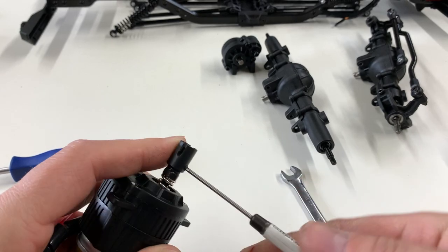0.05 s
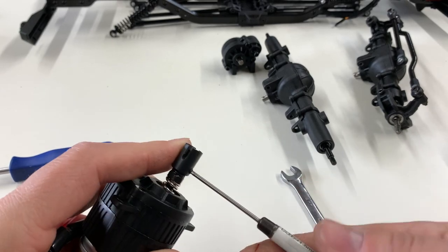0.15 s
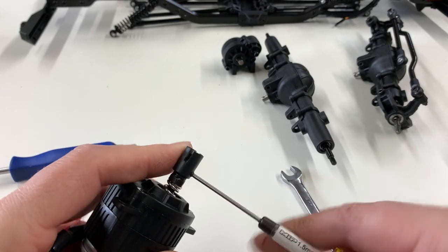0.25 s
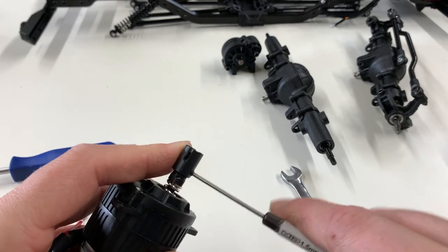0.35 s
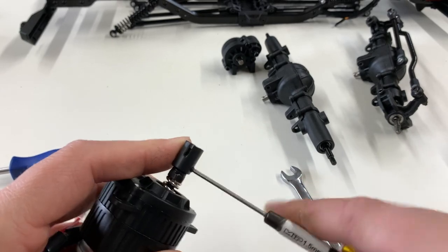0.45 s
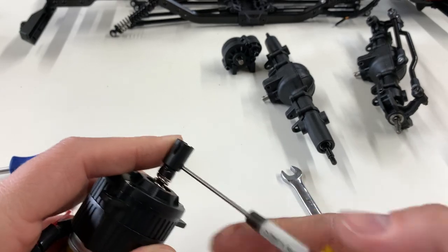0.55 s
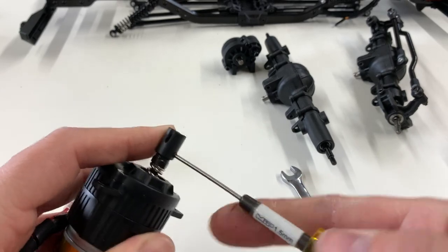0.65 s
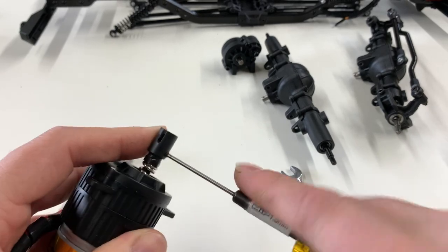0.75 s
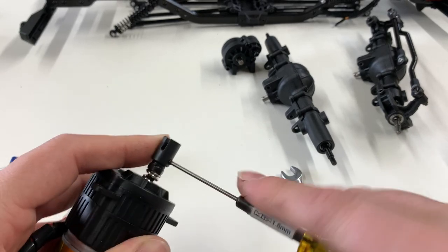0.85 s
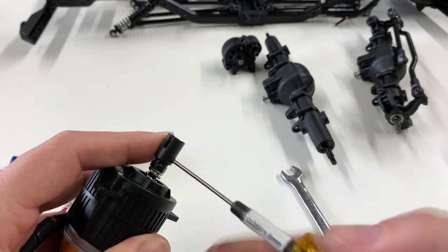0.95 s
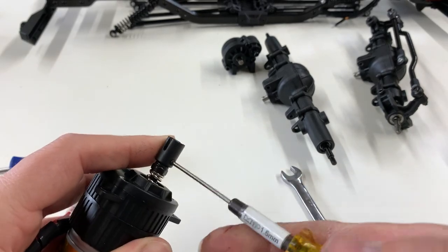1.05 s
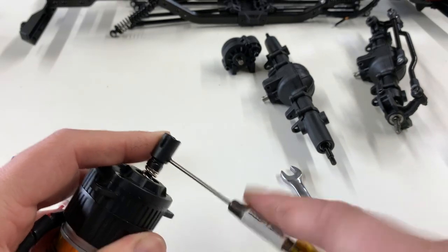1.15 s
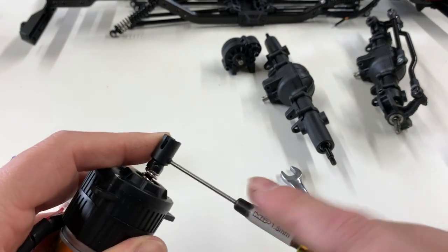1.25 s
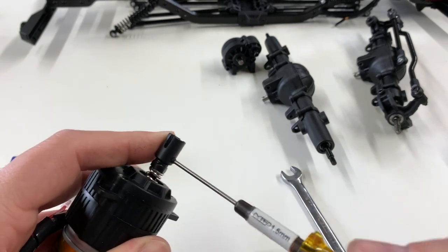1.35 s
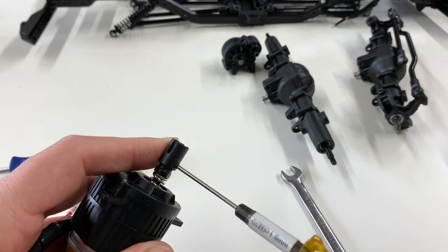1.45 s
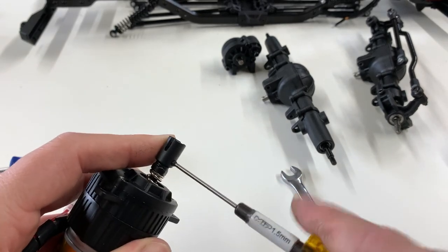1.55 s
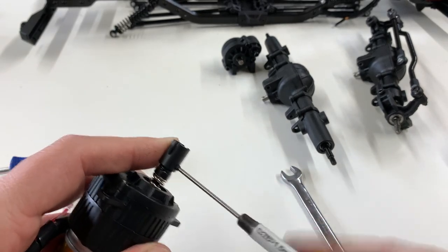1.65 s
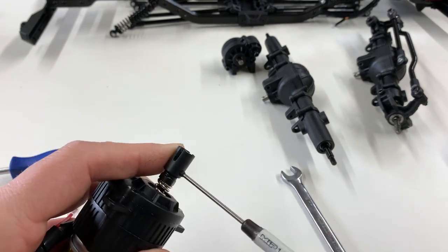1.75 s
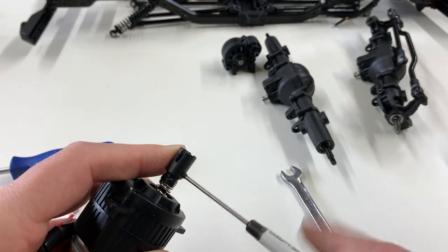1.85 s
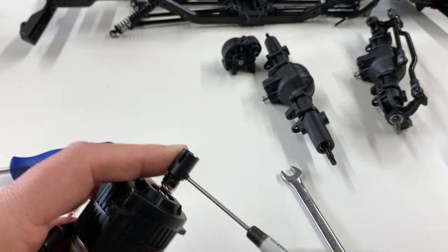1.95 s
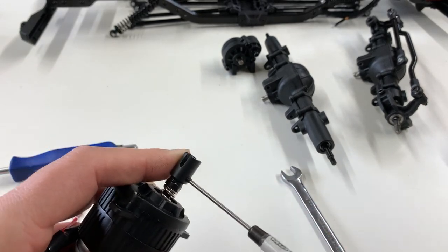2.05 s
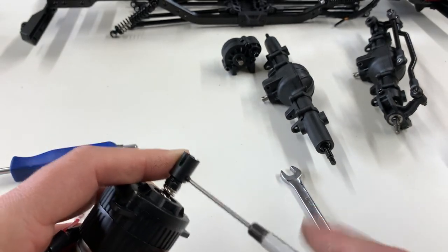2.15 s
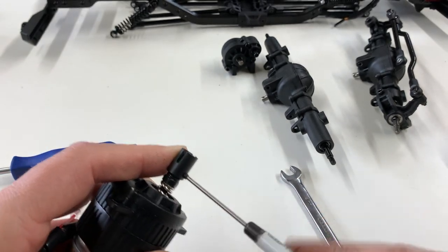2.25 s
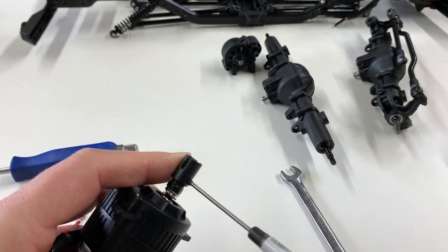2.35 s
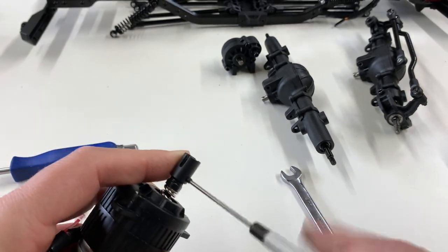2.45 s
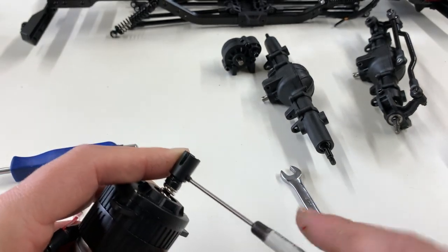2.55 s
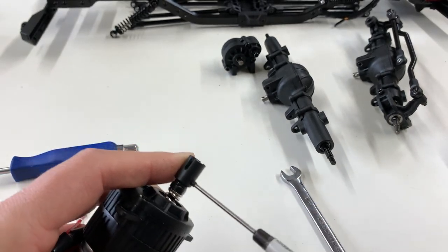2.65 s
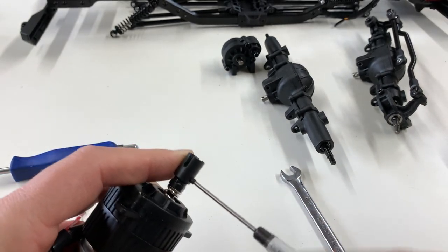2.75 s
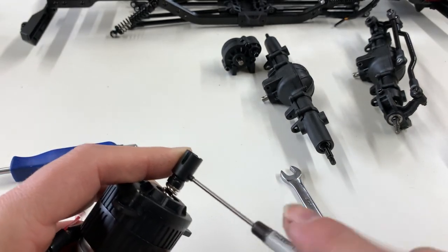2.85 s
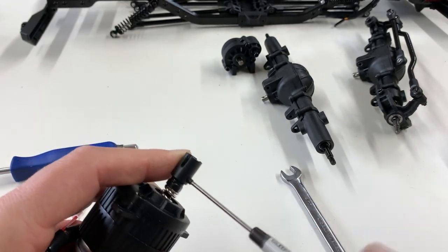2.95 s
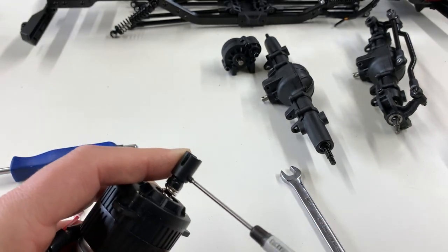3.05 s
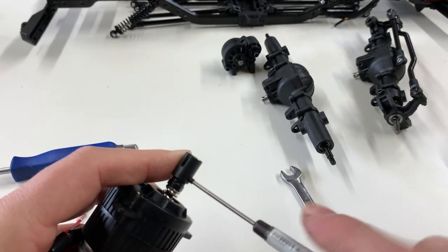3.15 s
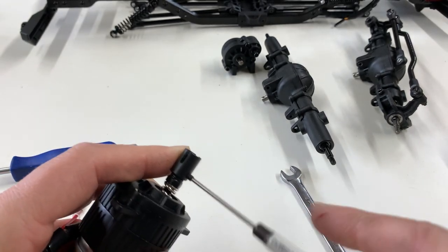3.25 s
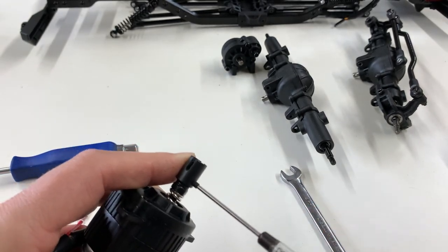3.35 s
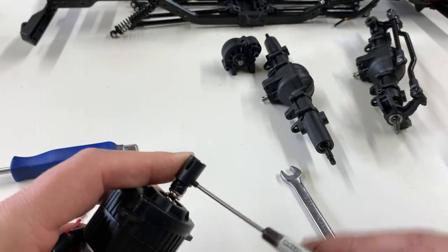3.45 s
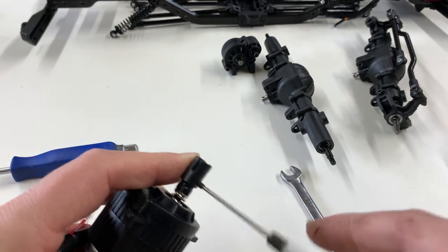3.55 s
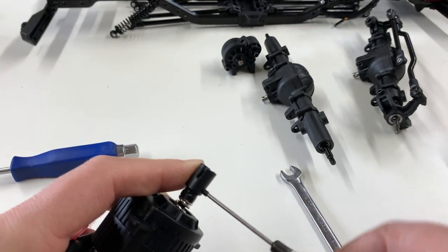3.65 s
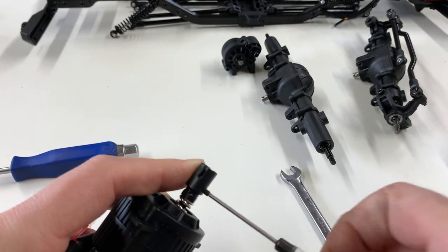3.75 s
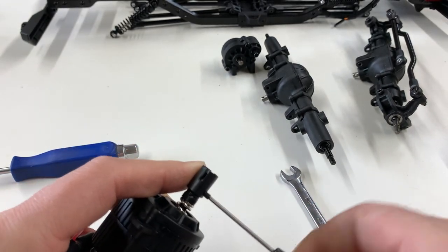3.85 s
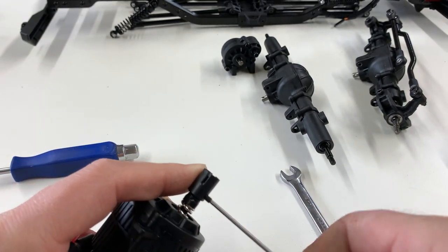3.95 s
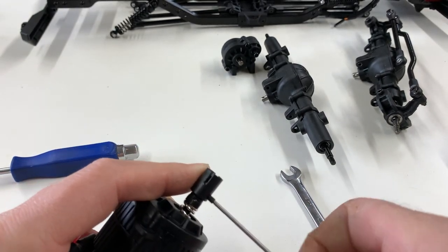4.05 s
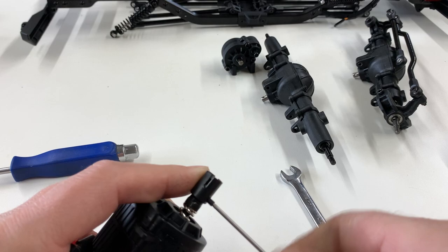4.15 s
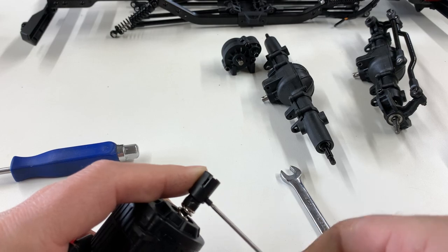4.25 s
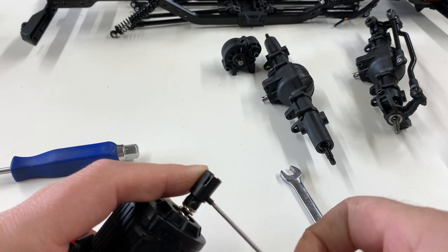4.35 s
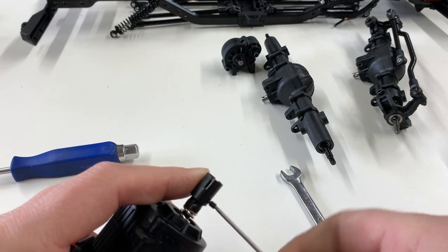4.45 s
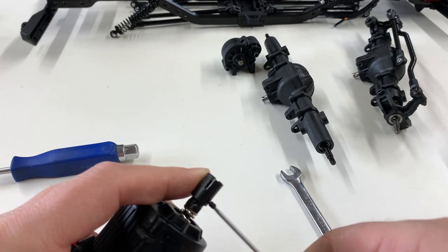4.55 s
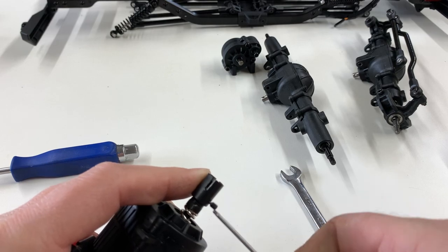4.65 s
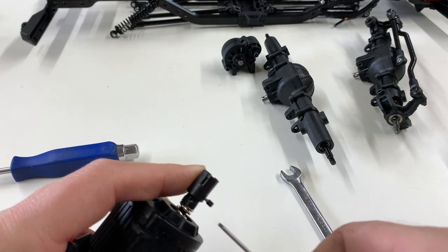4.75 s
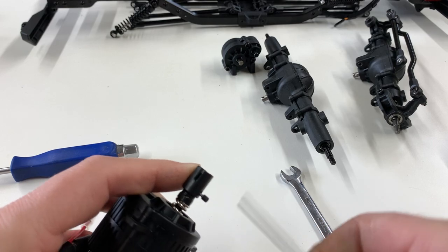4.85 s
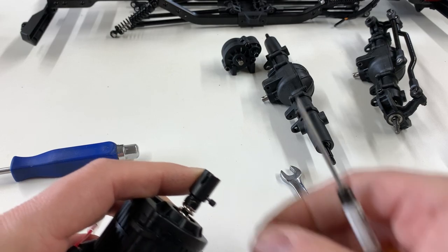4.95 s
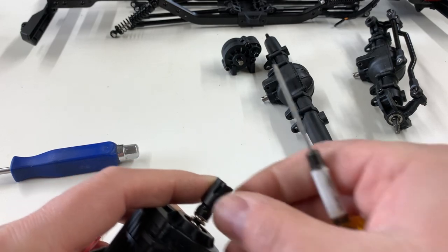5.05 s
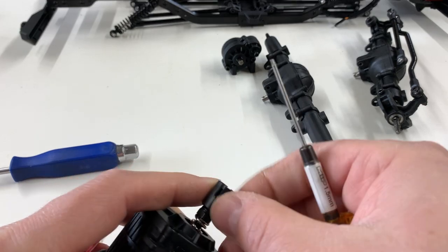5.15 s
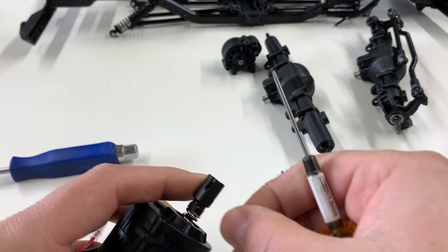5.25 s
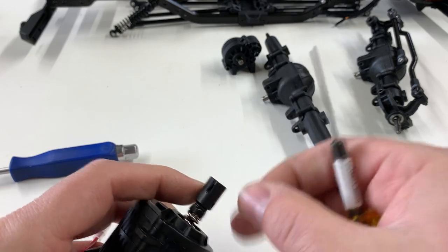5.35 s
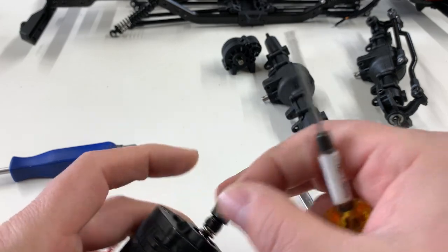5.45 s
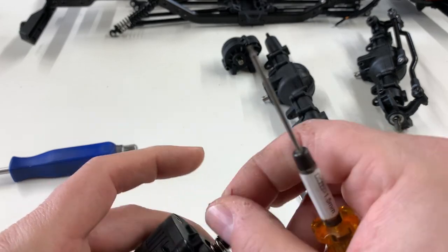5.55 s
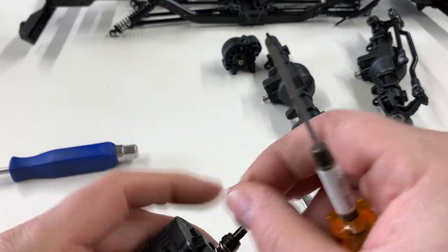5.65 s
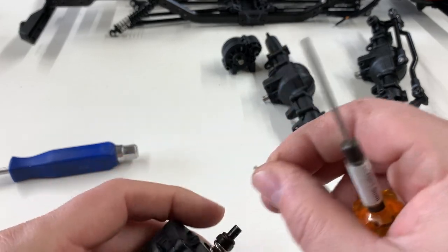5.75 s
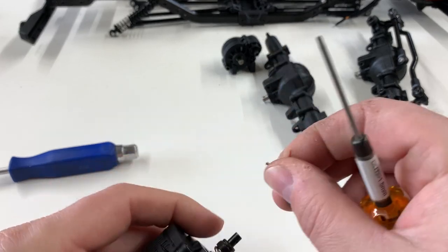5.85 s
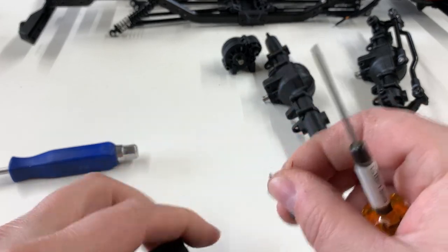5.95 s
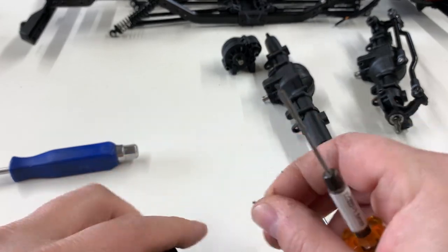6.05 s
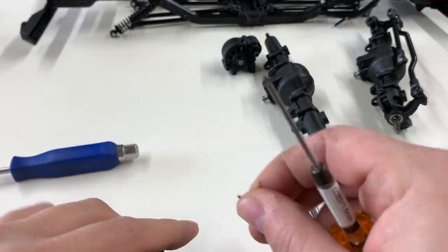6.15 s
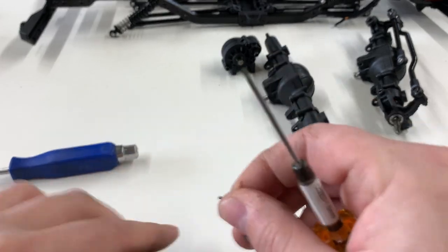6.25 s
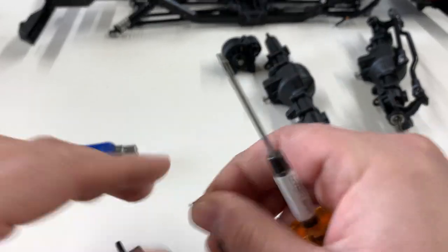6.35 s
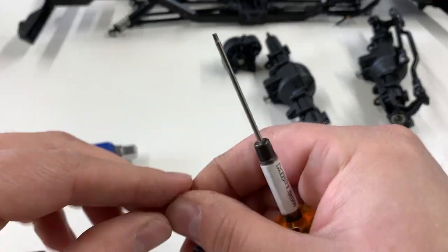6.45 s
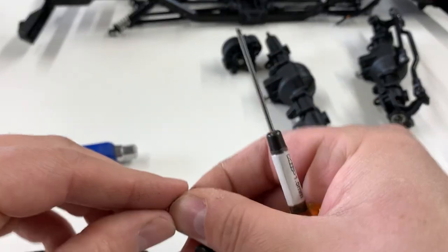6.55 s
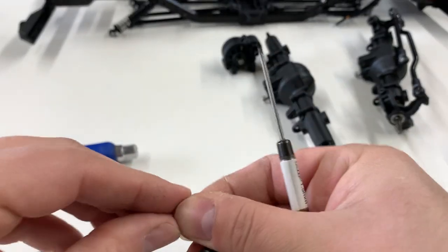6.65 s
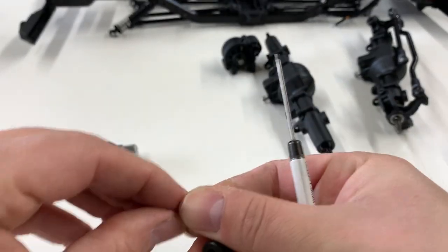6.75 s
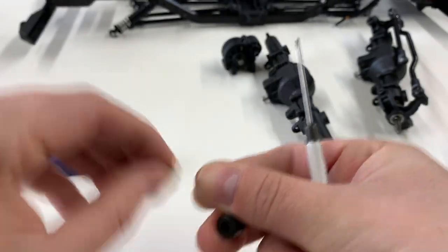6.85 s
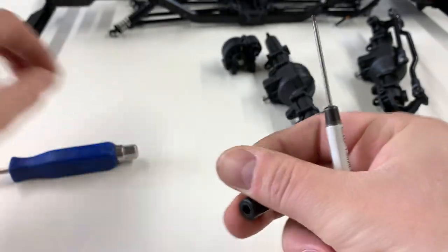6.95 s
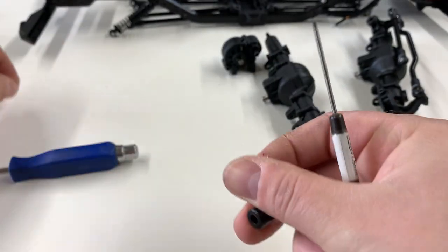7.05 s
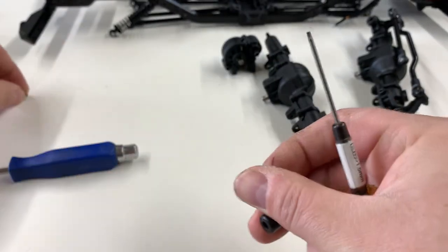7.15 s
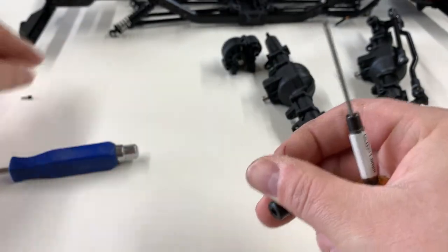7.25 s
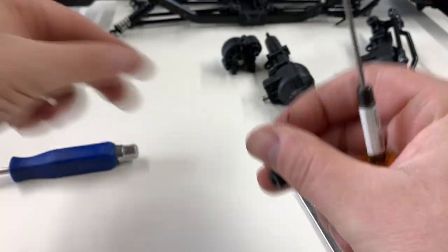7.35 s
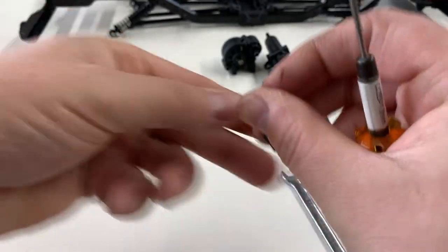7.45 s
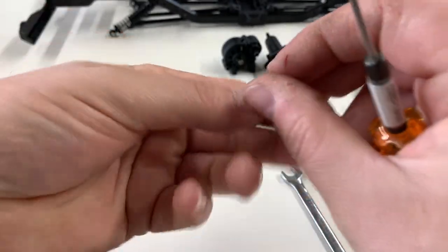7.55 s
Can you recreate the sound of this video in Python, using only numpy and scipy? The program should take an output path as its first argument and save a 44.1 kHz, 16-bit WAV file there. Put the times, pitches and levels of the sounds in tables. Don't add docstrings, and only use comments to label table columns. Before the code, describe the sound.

Small bright ticks and faint skin rustle in a quiet room, a tiny screw rattling loose, sudden bench knocks, then a light bouncing drop.

```python
import sys
import numpy as np
from scipy import signal
from scipy.fft import rfft, irfft
from scipy.io import wavfile
from scipy.ndimage import uniform_filter1d

SR = 44100
rng = np.random.default_rng(int(sys.argv[2]) if len(sys.argv) > 2 else 0)


def convert_level_to_amplitude(level_db):
    exponent = np.asarray(level_db, float) / 20
    return 10 ** exponent


def generate_wav(signal):
    frames = np.transpose(np.atleast_2d(signal))
    scaled = np.clip(frames, -1, 1) * 32767
    pcm = np.round(scaled).astype(np.int16)
    wavfile.write(sys.argv[1], SR, pcm)


N = 335160
RING_SAMPLES = 40000


def peaked(x):
    return x / (abs(x).max() + 1e-12)


def add(mix, s, sound):
    part = mix[round(s * SR):][:len(sound)]
    part += sound[:len(part)]


def play(mix, rows, source):
    for s, *controls in rows:
        add(mix, s, source(*controls))


def read(points, hz):
    f, value = np.transpose(points)
    return np.interp(np.log(hz + 1), np.log(f + 1), value)


def curve(rows):
    s, db = np.transpose(rows)
    return convert_level_to_amplitude(np.interp(np.arange(N) / SR, s, db))


def noise(shape, size):
    hz = np.fft.rfftfreq(size, 1 / SR)
    white = rfft(rng.standard_normal(size))
    x = irfft(white * convert_level_to_amplitude(read(shape, hz)) * (hz > shape[0][0]), size)
    return x / x.std()


def ring(modes, size, spread_db=0., lift=None):
    hz, db, t60 = np.transpose(modes)[:, :, None]
    t = np.arange(size) / SR
    db = db + spread_db * rng.standard_normal(db.shape)
    if lift is not None:
        db = db + lift[:, None]
    return (convert_level_to_amplitude(db - 60 * t / t60) * np.sin(2 * np.pi * hz * t)).sum(0)


def burst(lo_hz, hi_hz, t60, size=700):
    t = np.arange(size) / SR
    band = signal.butter(2, [lo_hz, min(hi_hz, 20000)], "band", fs=SR)
    lumps = convert_level_to_amplitude(4. * np.repeat(rng.standard_normal(size // 30 + 1), 30)[:size])
    envelope = convert_level_to_amplitude(-60 * t / t60) * np.minimum(t / 0.00076, 1)
    return peaked(signal.lfilter(*band, rng.standard_normal(size) * lumps * envelope))


def stick_slip(size, rough_db):
    lumps = convert_level_to_amplitude(rough_db * rng.standard_normal(size // 130 + 2))
    gain = np.interp(np.arange(size) / 130, np.arange(len(lumps)), lumps)
    return gain / np.sqrt(np.mean(gain ** 2))


# frequency in Hz, level in dB per Hz.
BODY_SPECTRUM = [(650, -65), (1100, -2.5), (1810, 0.5), (2830, -2.5), (3860, 5.5), (4550, 2), (6000, 2),
                 (7800, -6.5), (13200, -120)]
SNAP_DB = -5.5
BODY_LAG_S = 0.00176
TOP_SPREAD = .07


def snap(db, hz, body_db, top_db):
    t = np.arange(700) / SR
    bright = peaked(burst(hz * 0.9, hz * 1.095, 0.0081) + 0.14 * burst(7200, 16000, 0.0098))
    body_envelope = convert_level_to_amplitude(-60 * t / 0.015) * np.minimum(t / BODY_LAG_S, 1) ** 2
    body = peaked(noise(BODY_SPECTRUM + [(9000, -29)], 700) * body_envelope)
    top_hz = 12400 * (1 + TOP_SPREAD * rng.standard_normal())
    top = burst(top_hz * 0.82, top_hz * 1.136, 0.014)
    return convert_level_to_amplitude(db + SNAP_DB) * bright + convert_level_to_amplitude(body_db + 1.5) * body + convert_level_to_amplitude(top_db + 4.0) * top


# start in seconds, peak in dB, plastic body in dB, top end in dB.
TURNS = [(0.0972, -41, -55.5, -70), (0.437, -37.5, -48.5, -54), (0.6114, -43.5, -52.5, -50),
         (0.7901, -33, -52, -43), (0.9036, -34, -46, -35), (1.281, -38.5, -52, -62),
         (1.418, -42, -57.5, -55), (1.6166, -35, -51, -54), (1.735, -44, -59, -50),
         (1.8681, -35, -53.5, -56), (2.0398, -49.5, -60, -60), (2.167, -42, -52.5, -52),
         (2.353, -48, -61.5, -51.5), (2.521, -44, -54, -58), (2.6627, -42.5, -60, -53),
         (2.72, -46.5, -55.5, -56), (2.851, -45, -52, -57), (3.004, -45, -62, -52), (3.0555, -35, -52, -54),
         (3.1434, -40, -55, -49), (3.4893, -54, -54, -53), (4.137, -60, -65.5, -59)]
TIP_HZ, TIP_GAIN_DB = 8900, 5.5
REGRIP_DELAY_S, REGRIP_S, SKIN_HZ = .005, 0.065, 9500
REGRIP_DB, REGRIP_FOLLOWS = -61, 0.38


def turns(mix):
    for s, db, body_db, top_db in TURNS:
        add(mix, s, snap(db + TIP_GAIN_DB, TIP_HZ, body_db, top_db))
        slide_db = REGRIP_DB + REGRIP_FOLLOWS * db
        add(mix, s + REGRIP_DELAY_S, rub(REGRIP_S, slide_db, SKIN_HZ))


# start in seconds, peak in dB.
SLIPS = [(.431, -54), (.604, -54), (.7853, -47), (.9003, -43), (1.275, -55), (1.411, -55), (1.6087, -56),
         (1.7252, -59), (1.8612, -54), (2.0274, -60), (2.1615, -52), (2.3425, -55), (2.5145, -54),
         (2.651, -60), (2.7125, -58), (3.138, -50), (3.4843, -64)]
SCRATCH_DB, SLIP_DB = 3, -4


def slip(db):
    scratch = peaked(burst(3150, 8000, 0.0078) + 0.9 * burst(8000, 9500, 0.0065))
    return convert_level_to_amplitude(db + SCRATCH_DB + SLIP_DB) * scratch


# start in seconds, peak in dB, brightest frequency in Hz, plastic body in dB.
TOUCHES = [(1.1727, -68, 11700, -74), (1.5628, -57, 7050, -55), (1.6482, -56, 6900, -49.5),
           (2.1166, -70, 8500, -56), (2.1261, -60, 8800, -55.5), (2.5052, -58, 7360, -61),
           (2.83, -44.5, 9500, -63), (2.8421, -60, 8600, -64), (3.044, -49, 6790, -49.5),
           (3.1183, -58, 9040, -57), (3.2156, -65, 4700, -56), (3.3154, -57, 7260, -65),
           (3.898, -59, 9500, -69), (4.2163, -53.5, 8150, -59), (4.3276, -55, 9200, -61),
           (5.0663, -61, 7300, -78), (5.0896, -52, 12100, -65), (5.3302, -45.5, 6440, -52.5),
           (5.4557, -60, 9250, -69), (5.3365, -68, 5000, -60), (5.4722, -60, 7740, -56),
           (5.481, -59, 8500, -67), (5.5406, -48, 5200, -60), (5.546, -51, 9000, -66),
           (5.551, -51, 4870, -64), (2.801, -64, 4000, -63.5), (2.811, -62, 7500, -68),
           (2.935, -66, 6000, -64), (3.197, -68, 5500, -68), (3.221, -58, 4700, -56),
           (.9165, -60, 8000, -65), (5.5633, -45.5, 9300, -58), (7.012, -60, 9500, -62.5)]


def touch(db, hz, body_db):
    return snap(db, hz, body_db, db - 10)


# start in seconds, peak in dB, frequency in Hz.
NUDGES = [(1.949, -60, 1430), (2.0267, -63, 1460), (2.2019, -58, 1500), (2.3694, -68, 1370),
          (2.542, -59.5, 1660), (2.7195, -59.5, 1590), (3.24, -69, 1740), (7.0116, -54.5, 1350),
          (7.099, -60, 1490), (7.1594, -62, 1560)]


def nudge(db, hz):
    return convert_level_to_amplitude(db - 2.5) * burst(hz * 0.78, hz * 1.18, 0.045, size=1500)


# start in seconds, length in seconds, level in dB, brightest frequency in Hz.
RUBS = [(.79, 0.15, -76, 9800), (.91, .07, -82, 11500), (1.04, 0.08, -72.5, 9700), (1.16, 0.11, -70, 11800),
        (1.52, 0.081, -71.5, 9300), (3.05, 0.09, -76, 9500), (6.4, 0.23, -87, 3700),
        (1.825, .03, -75, 9300), (1.83, 0.027, -75, 5600), (2.19, .04, -76, 11800), (.45, .05, -76, 10200),
        (.63, .05, -77, 5200), (4.3, .063, -77, 5030), (5.5, 0.056, -77, 5000), (5.538, 0.022, -62, 4840),
        (5.565, .04, -77, 9500), (5.75, 0.16, -78.5, 9600), (5.96, 0.061, -67.5, 9200),
        (6.05, 0.22, -68, 9500), (6.2, 0.11, -69.5, 9100), (6.57, 0.21, -76.5, 9980),
        (6.78, 0.027, -59, 9700), (7.09, 0.1, -63, 10700), (7.13, .22, -75, 10000), ]
# frequency as a ratio to the brightest, level in dB per Hz.
SKIN_TONE = [(.3, -16), (.55, -9.5), (.85, -7.5), (.97, 0), (1.08, -2), (1.22, -7), (1.35, -7.5),
             (1.6, -11.5)]


def rub(length, db, hz):
    size = int(length * 1.75 * SR)
    u = np.arange(size) / size
    grain = stick_slip(size, rough_db=3.0)
    hiss = noise([(hz * k, d) for k, d in SKIN_TONE], 18000)[:size]
    return convert_level_to_amplitude(db) * hiss * grain * np.sin(np.pi * u ** 0.42) ** 2


# start in seconds, level in dB, frequency in Hz, length in seconds.
SHAFT = [(.598, -77.5, 2670, .23), (.93, -83, 2600, 0.19), (1.18, -82.5, 2100, 0.18),
         (1.54, -80, 2150, 0.063), (1.81, -77.5, 2100, .12), (2.03, -86, 2150, 0.17)]


def shaft(db, hz, length):
    size = int(length * SR)
    band = [(hz * .8, -34), (hz * .972, -12), (hz, 0), (hz * 1.028, -12), (hz * 1.25, -34), (hz * 2, -80)]
    envelope = signal.windows.tukey(size, .15) * convert_level_to_amplitude(np.linspace(0, -5., size))
    return convert_level_to_amplitude(db) * noise(band, 12000)[:size] * envelope


# start in seconds, peak in dB.
ROCKS = [(0.075, -79), (0.131, -66), (0.22, -63.5), (0.323, -62.5), (0.483, -58.5), (0.547, -59),
         (0.805, -58.5), (1.058, -59.5), (1.241, -57.5), (1.6, -55), (1.751, -63.5), (1.887, -59),
         (2.102, -56.5), (2.235, -62), (2.371, -55.5), (2.476, -59), (2.552, -57), (2.659, -55),
         (2.77, -55), (2.909, -59), (3.062, -62.5), (3.185, -63),
         (3.397, -55), (3.483, -60.5), (3.568, -59), (3.698, -56.5), (3.823, -56), (3.907, -59.5),
               (3.977, -59.5), (4.077, -58), (4.184, -57.5), (4.298, -58), (4.407, -55.5), (4.518, -58),
               (4.606, -61), (4.697, -62.5), (4.784, -60.5), (5.68, -62), (5.763, -66), (5.864, -57.5)]
# frequency in Hz, level in dB, decay time T60 in seconds.
ROCK_MODES = [(677, 10, 0.087), (1028, 2.5, 0.088), (731, -4, 0.1), (961, -8, 0.2)]
HARDER_IS_BRIGHTER, MIDDLE_ROCK_DB = 0.62, -69


def rock(db):
    contact = np.hanning(36)
    upper_db = HARDER_IS_BRIGHTER * (db - MIDDLE_ROCK_DB)
    lift = upper_db * (np.arange(len(ROCK_MODES)) == 1)
    hollow = peaked(np.convolve(contact, ring(ROCK_MODES, 3500, 1., lift))[:3500])
    scuff = burst(560, 1420, 0.07, size=3500)
    return convert_level_to_amplitude(db - 1.0) * (hollow + convert_level_to_amplitude(-7.5) * scuff)


# start in seconds, peak in dB, share of the lowest mode in dB.
RATTLE = [(4.447, -58, -10), (4.4525, -56, -10), (4.461, -50, -5), (4.464, -46, -3), (4.4665, -47, 3),
          (4.4714, -45, 0), (4.476, -46, 0), (4.5157, -42.5, -22), (4.5224, -42.5, -10), (4.533, -44, -4),
          (4.537, -48, 5), (4.5464, -41, -2), (4.549, -55, 3), (4.5668, -45.5, 3), (4.5739, -51, 16),
          (4.5784, -48, -2)]
# frequency in Hz, level in dB, decay time T60 in seconds.
SCREW = [(4700, -0.5, 0.051), (5870, 6, 0.04), (9070, 9, 0.017), (11200, 4, .006), (12700, 10.5, 0.0067),
         (14100, -8, .005)]


def rattle(db, low_db):
    size = 1300
    touches = rng.standard_normal(400) * convert_level_to_amplitude(5.6 * rng.standard_normal(400))
    chatter = np.diff(touches * np.exp(-np.arange(400) / 80.0), 2)
    lift = low_db * (np.arange(len(SCREW)) == 0)
    loose = []
    for hz, mode_db, t60 in SCREW:
        detuned = hz * (1 + .008 * rng.standard_normal())
        loose.append((detuned, mode_db - 12 * np.log2(hz / 5000), t60 * .6))
    rung = peaked(np.convolve(chatter, ring(loose, size, 1.1, lift))[:size])
    hiss = convert_level_to_amplitude(-11) * burst(8100, 16000, 0.035, size=size)
    scrape = convert_level_to_amplitude(-15) * burst(4300, 6500, .03, size=size)
    return convert_level_to_amplitude(db - 3.3) * (rung + hiss + scrape)


# frequency in Hz, level in dB, decay time T60 in seconds, spread in Hz.
BENCH = [(197.5, 0.5, 0.52, 14), (344, 6.5, 1.27, 9.02), (400, -5, 2, 9), (658, -10, 1.45, 51),
         (892, -1, 0.76, 12), (980, -3, 1.38, 38), (1650, -8, 1.04, 30), (1820, -8.5, 1.1, 25.1),
         (1930, -9, 1.05, 41), (2150, -7, 0.8, 24.8), (2210, -7, 0.51, 50), (9110, -7, .6, 110)]


def bench():
    modes = []
    for hz, db, t60, wide_hz in BENCH:
        for u in (-1, -.62, -.3, -.07, .24, .51, .93):
            modes.append((hz + wide_hz * u, db, t60))
    return ring(modes, RING_SAMPLES, 2.5)


# frequency in Hz, level in dB per Hz.
BOARD = [(120, -5.5), (250, -4.5), (370, -2.5), (900, -12.5), (1300, -17.5), (2000, -13.5), (3000, -29),
         (6000, -28.5), (9100, -5.5), (14000, -20.5)]
# frequency in Hz, decay time T60 in seconds.
BOARD_T60 = [(150, 1.8), (350, 1.7), (1000, 1.33), (2000, 1.45), (4000, 2.6), (9000, 0.52)]


def board():
    hz, t, z = signal.stft(noise(BOARD, RING_SAMPLES), SR, nperseg=256)
    decay = convert_level_to_amplitude(-60 * t / read(BOARD_T60, hz)[:, None])
    return signal.istft(z * decay, SR, nperseg=256)[1][:RING_SAMPLES]


# start in seconds, peak in dB, thud below 150 Hz in dB,
# contact time in ms, share of bench ring in dB.
KNOCKS = [(5.943, -23, -46, 0.37, -22), (5.952, -44, -64, 0.63, -22), (6.025, -16, -31.5, 0.17, -18.5),
          (6.036, -40, -41.5, 0.69, -25), (6.048, -24, -44.5, 0.26, -21), (6.061, -33, -42.5, 0.2, -24),
          (6.165, -17.5, -33.5, 0.14, -17.5), (6.187, -24, -55, 0.23, -20), (6.778, -30, -46, 0.27, -14.5),
          (6.795, -35, -56.5, 0.7, -15), (6.832, -47, -64, 0.99, -17), (7.013, -57, -50.5, 0.095, -24)]
# frequency in Hz, level in dB, decay time T60 in seconds.
HOUSING = [(186.6, -16.5, 0.2), (360, -20.5, 0.068), (412, 0.5, 0.036), (467, -5, 0.073), (627, -15, 0.087),
           (727, -7, 0.029), (920, -14, 0.062), (1256, -18.5, 0.064), (1487, -14, 0.049), (1754, -22, 0.05),
           (2100, -13.5, 0.023)]
# frequency in Hz, level in dB, decay time T60 in seconds.
THUD = [(43, 0.5, 1), (60.1, 4, 0.57), (92.6, 7, 0.12)]


def knock(db, thud_db, contact_ms, bench_db, bench_ring):
    push = np.hanning(int(max(contact_ms, .1) * SR / 1000) + 3)
    t = np.arange(RING_SAMPLES) / SR
    short = RING_SAMPLES // 4
    housing = -peaked(np.pad(ring(HOUSING, short, 1.5), (0, RING_SAMPLES - short)))
    fast = convert_level_to_amplitude(-60 * t / 0.17)
    blur = (convert_level_to_amplitude(-2.0) * fast + convert_level_to_amplitude(-26.5)) * peaked(board())
    body = housing + convert_level_to_amplitude(bench_db) * bench_ring + blur
    onset = np.minimum(0.74 + t / 0.0081, 1)
    struck = peaked(signal.oaconvolve(body * onset, push)[:RING_SAMPLES])
    thud = peaked(ring(THUD, RING_SAMPLES, 0.72)) * np.minimum(t / 0.0048, 1)
    sound = convert_level_to_amplitude(db - 1.5) * struck + convert_level_to_amplitude(thud_db + 7.0) * thud
    fade = signal.windows.tukey(2 * RING_SAMPLES, .3)[RING_SAMPLES:]
    return np.r_[np.zeros(125), sound * fade]


# start in seconds, peak in dB, brightest frequency in Hz, plastic body in dB.
CLATTER = [(5.9459, -33, 8700, -44), (5.949, -40, 9500, -49), (5.9548, -35, 9800, -49),
           (5.958, -40, 8500, -60), (6.0275, -18.5, 8100, -33), (6.031, -39, 9350, -46),
           (6.0375, -30, 9100, -44), (6.0445, -30, 10100, -57), (6.0485, -33, 9300, -45),
           (6.051, -35, 9800, -46), (6.0605, -33, 8500, -52), (6.0668, -39, 10200, -60),
           (6.0708, -40, 10200, -60), (6.0755, -43, 9100, -66), (6.1425, -49, 10000, -70),
           (6.1474, -41, 9300, -57), (6.152, -48, 7800, -64), (6.1575, -31, 4700, -35.5),
           (6.158, -30, 9400, -48), (6.1672, -30, 7350, -39), (6.171, -39, 9400, -54),
           (6.187, -32, 7900, -44), (6.190, -34, 9400, -52), (6.198, -34, 9250, -43.5),
           (6.2015, -36, 9000, -52), (6.205, -41, 8600, -58), (6.214, -46, 9500, -64),
           (6.6777, -54, 8500, -69), (6.7067, -58, 8500, -76), (6.781, -41.5, 8350, -50),
           (6.7875, -47, 8800, -51), (6.8033, -45, 8500, -56), (6.81, -39, 9400, -77),
           (6.8338, -46, 8500, -72)]


def jump(db, hz, body_db):
    return snap(db, hz, body_db, db - 14)


# start in seconds, peak in dB, brightest frequency in Hz.
DROP = [(7.0831, -42, 9700), (7.097, -40.5, 8000), (7.1034, -45, 9500), (7.119, -50, 9000),
        (7.1296, -42, 9700), (7.135, -55, 11000), (7.1483, -47, 10500), (7.157, -54, 11500),
        (7.162, -53, 10300), (7.175, -53, 7500), (7.1814, -53, 7800), (7.2054, -60, 10000),
        (7.217, -60, 10000)]


def bounce(db, hz):
    return snap(db, hz, db - 16, db - 8.5)


# start in seconds, peak in dB, frequency in Hz.
BUMPS = [
    (.600, -64, 416),
    (.602, -56, 131),
    (.620, -62, 430),
    (.621, -58, 170),
]


def bump(db, hz):
    return convert_level_to_amplitude(db) * burst(hz * 0.95, hz * 1.42, .07, size=4000) * np.minimum(np.arange(4000) / 220.0, 1)


# time in seconds, pitch in Hz, level in dB.
WHISTLE = [(6.33, 10080, -100), (6.4, 10700, -79), (6.435, 11340, -99), (6.46, 12440, -84),
           (6.5, 12620, -78), (6.55, 12150, -100), (6.598, 12650, -77), (6.63, 12400, -90),
           (6.66, 11300, -100)]


def whistle():
    s, hz, db = np.transpose(WHISTLE)
    t = np.arange(s[0], s[-1], 1 / SR)
    glide = uniform_filter1d(np.interp(t, s, hz), size=600)
    tremble = 900. * uniform_filter1d(rng.standard_normal(len(t)), size=150)
    return convert_level_to_amplitude(np.interp(t, s, db)) * np.sin(2 * np.pi * np.cumsum(glide + tremble) / SR)


# time in seconds, level in dB.
BUSY = [(0, -82), (.4, -83), (1.6, -82), (3.2, -81), (3.5, -85), (7.6, -87.5)]


def rustle():
    at = np.arange(0, N, 1500)
    swells = np.interp(np.arange(N), at, rng.standard_normal(len(at)))
    hiss = noise([(9500 * k, db) for k, db in SKIN_TONE], N)
    return curve(BUSY) * convert_level_to_amplitude(3.6 * swells) * stick_slip(N, rough_db=2.0) * hiss


def room(x):
    slots = np.arange(250, 12000, 22)
    at = slots + rng.integers(0, 22, len(slots))
    taps = np.zeros(12100)
    taps[at] = rng.choice([-1., 1.], len(at)) * convert_level_to_amplitude(-60 * at / SR / 0.34)
    return signal.fftconvolve(x, taps / np.linalg.norm(taps))[:N]


# frequency in Hz, level in dB per Hz.
SWAY = [(4, -12), (8, 0), (15, 0), (20, -9), (26, -30), (40, -80)]
# time in seconds, level in dB.
SWAY_DB = [(0.0, -55.5), (1.61, -43), (4.25, -58), (7.6, -56)]
# frequency in Hz, level in dB per Hz.
RUMBLE = [(12, -30.5), (20, 0), (43, 0), (76, -7), (97, -18), (125, -18.5), (200, -33.5), (270, -73)]
# frequency in Hz, level in dB per Hz.
AIR = [(59, -22), (100, -7.5), (256, -14), (440, -19.5), (667, -21.5), (1500, -28.5), (5630, -35),
       (16300, -37)]
RUMBLE_DB, AIR_DB = -58.5, -70.5


def background():
    sway = curve(SWAY_DB) * noise(SWAY, N)
    rumble = convert_level_to_amplitude(RUMBLE_DB) * noise(RUMBLE, N)
    return sway + rumble + convert_level_to_amplitude(AIR_DB) * noise(AIR, N)


def scene():
    near = np.zeros(N)
    turns(near)
    play(near, SLIPS, slip)
    play(near, TOUCHES, touch)
    play(near, NUDGES, nudge)
    play(near, RUBS, rub)
    play(near, SHAFT, shaft)
    play(near, ROCKS, rock)
    play(near, RATTLE, rattle)
    bench_ring = peaked(bench())
    for s, *controls in KNOCKS:
        add(near, s, knock(*controls, bench_ring))
    play(near, CLATTER, jump)
    play(near, DROP, bounce)
    play(near, BUMPS, bump)
    add(near, WHISTLE[0][0], whistle())
    wet = convert_level_to_amplitude(-21) * room(near)
    return (near + wet + rustle() + background())[None]


def top_cut(x):
    return signal.sosfilt(signal.butter(12, 16490, fs=SR, output="sos"), x)


def record(dry):
    lowpass = signal.firwin(201, 15950, fs=SR)[None]
    limited = signal.oaconvolve(dry, lowpass, "same")
    return top_cut(limited)


dry = scene()
out = record(dry)
generate_wav(out)
```